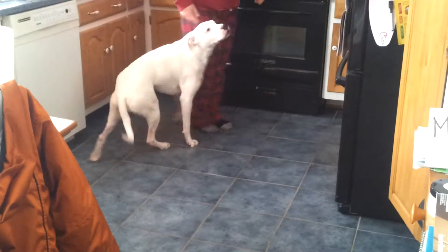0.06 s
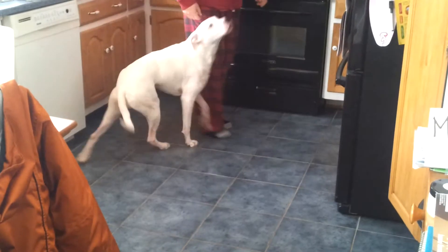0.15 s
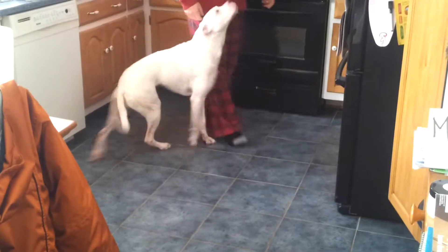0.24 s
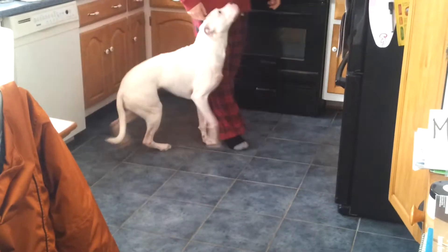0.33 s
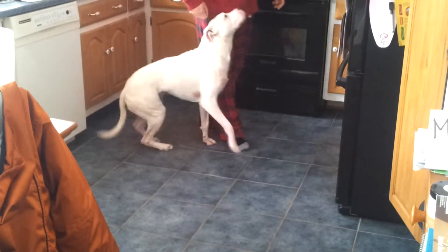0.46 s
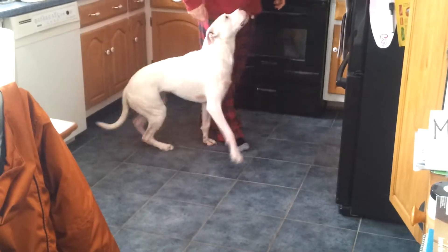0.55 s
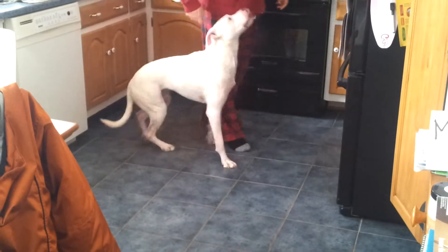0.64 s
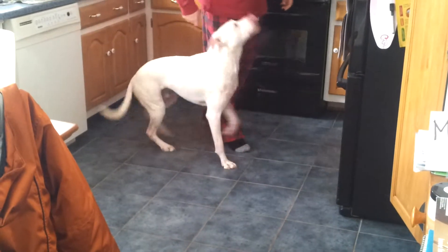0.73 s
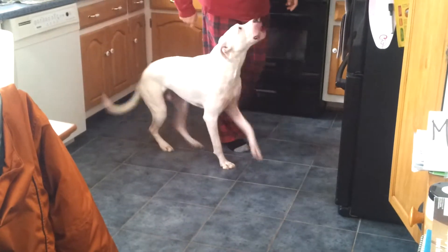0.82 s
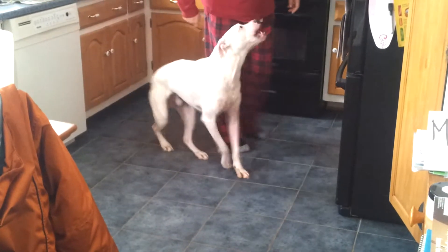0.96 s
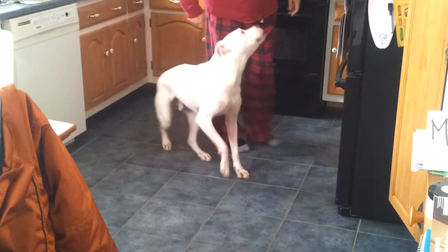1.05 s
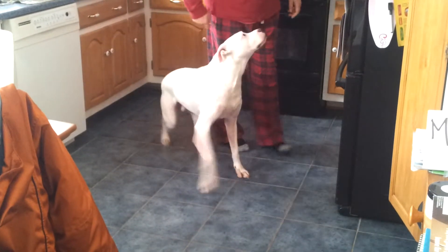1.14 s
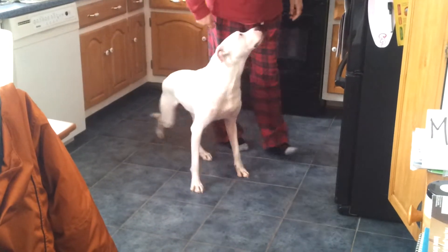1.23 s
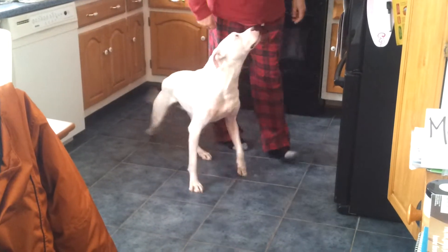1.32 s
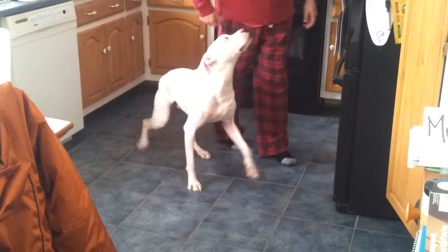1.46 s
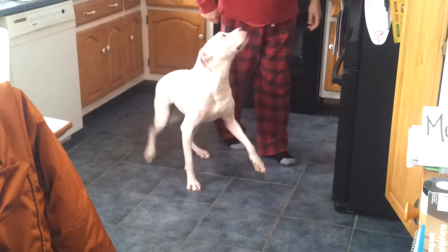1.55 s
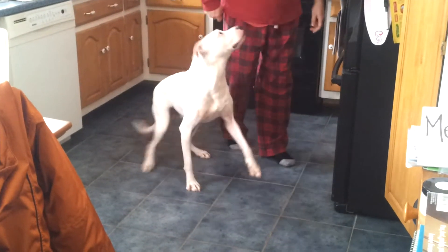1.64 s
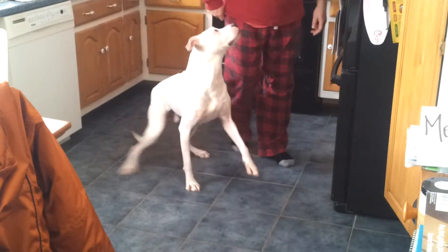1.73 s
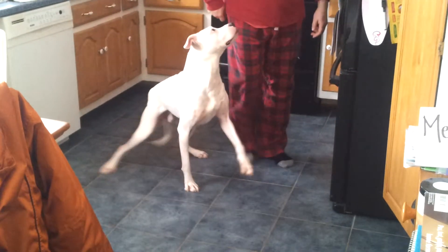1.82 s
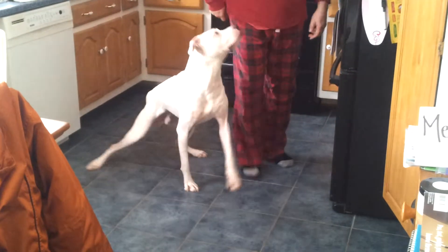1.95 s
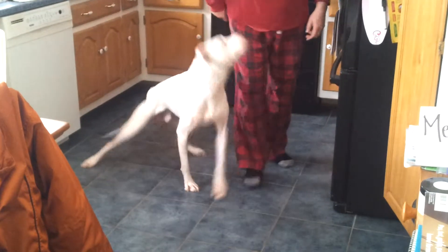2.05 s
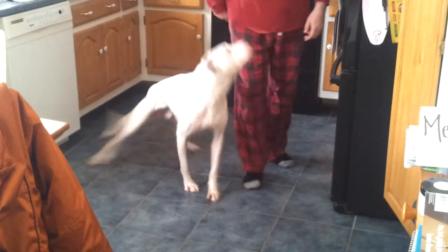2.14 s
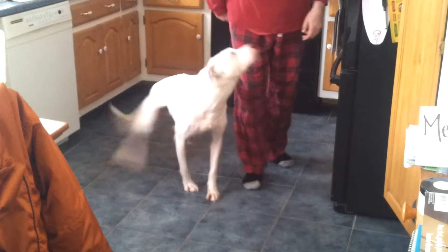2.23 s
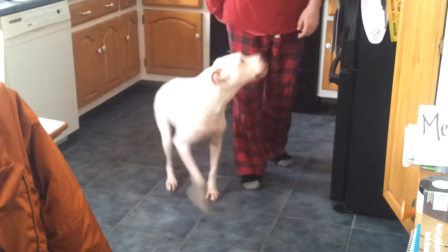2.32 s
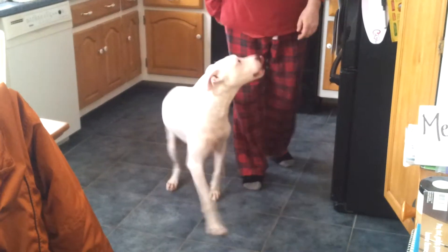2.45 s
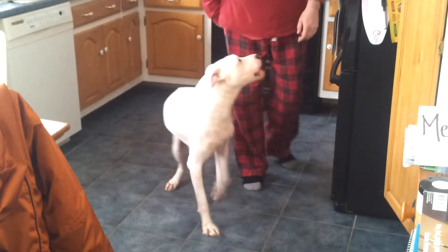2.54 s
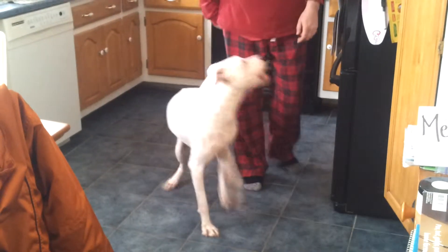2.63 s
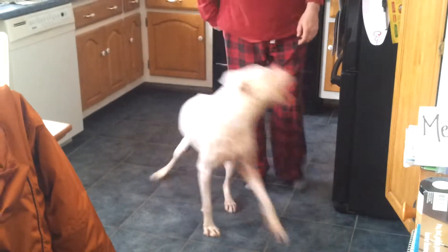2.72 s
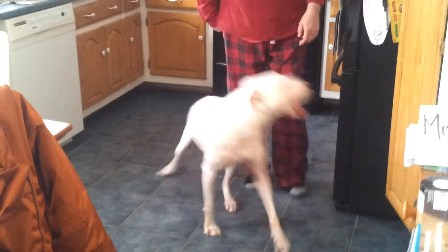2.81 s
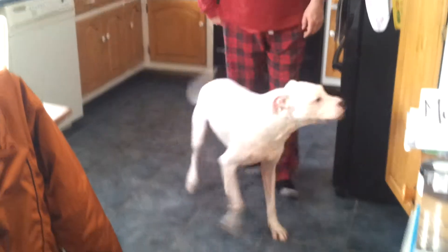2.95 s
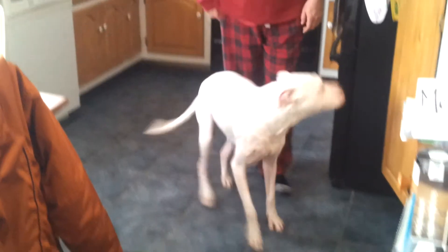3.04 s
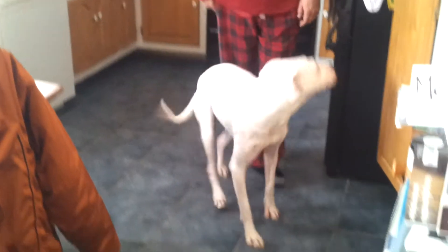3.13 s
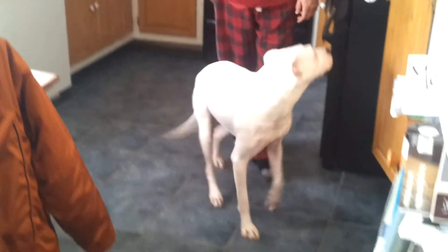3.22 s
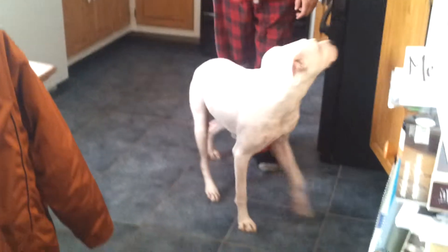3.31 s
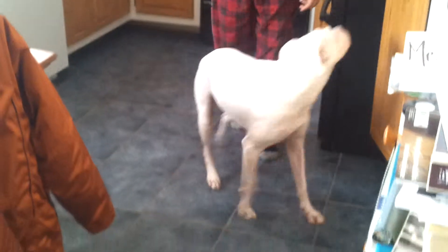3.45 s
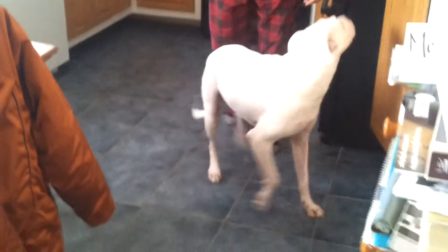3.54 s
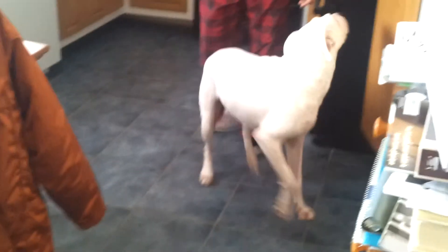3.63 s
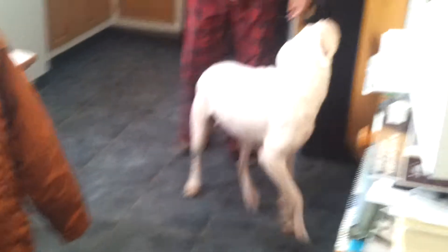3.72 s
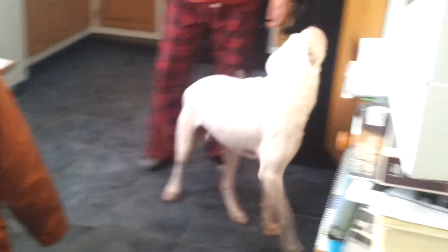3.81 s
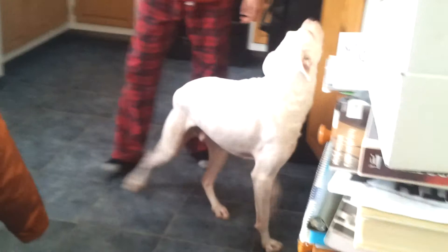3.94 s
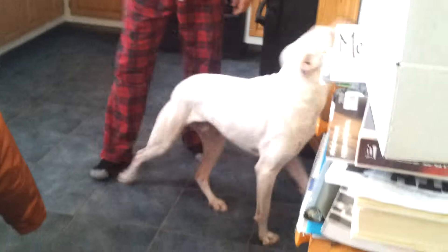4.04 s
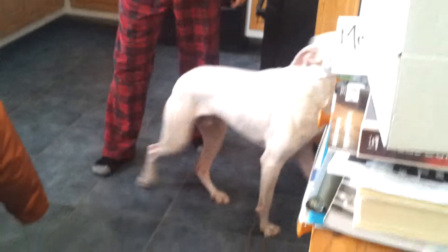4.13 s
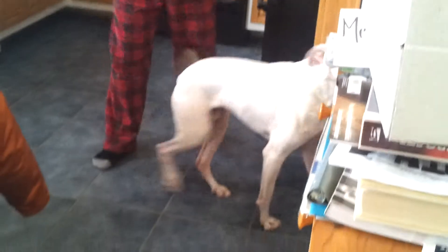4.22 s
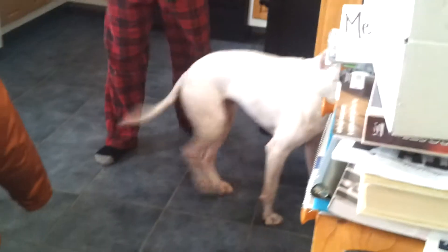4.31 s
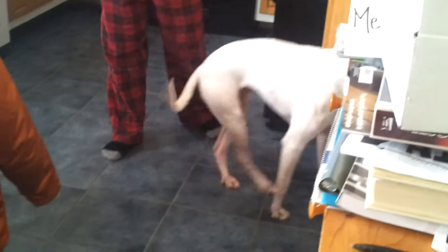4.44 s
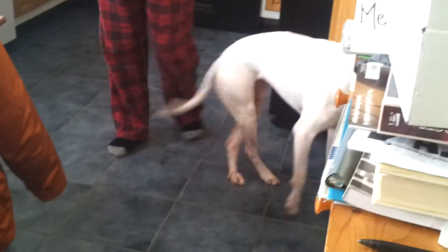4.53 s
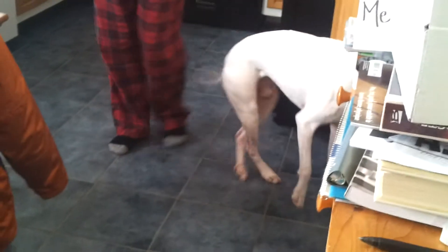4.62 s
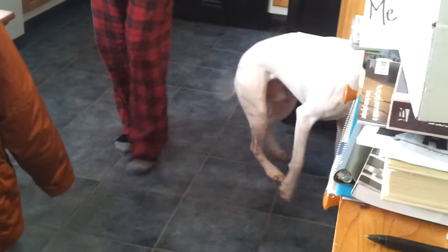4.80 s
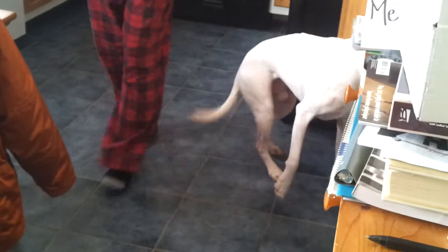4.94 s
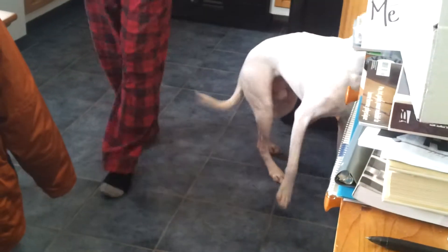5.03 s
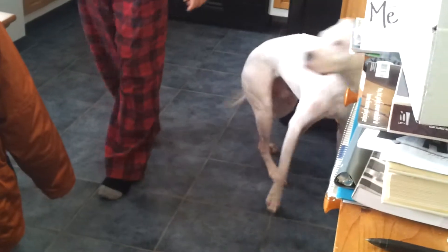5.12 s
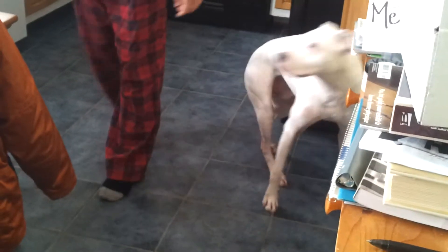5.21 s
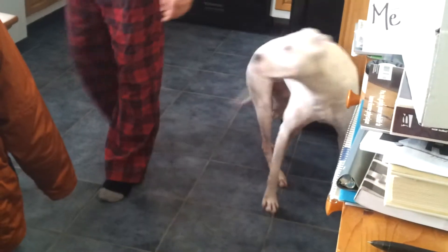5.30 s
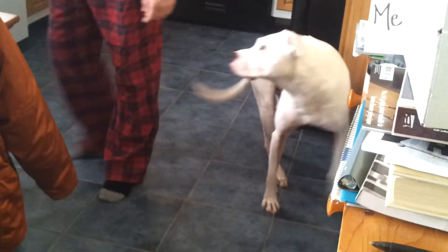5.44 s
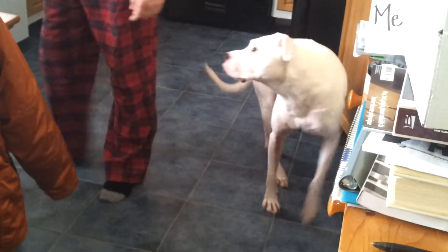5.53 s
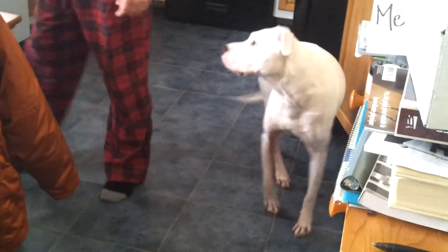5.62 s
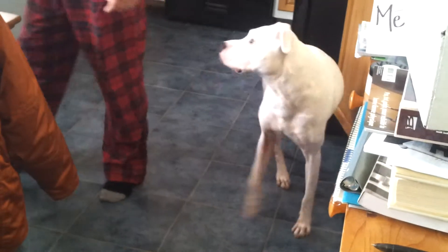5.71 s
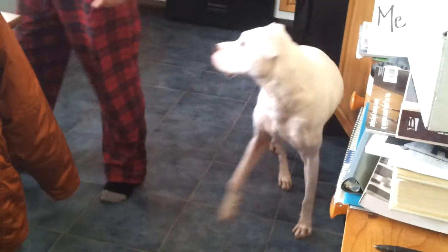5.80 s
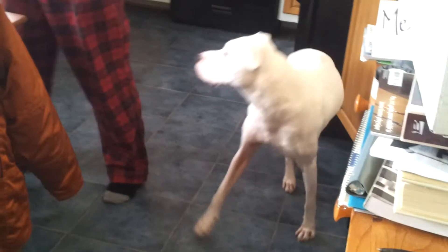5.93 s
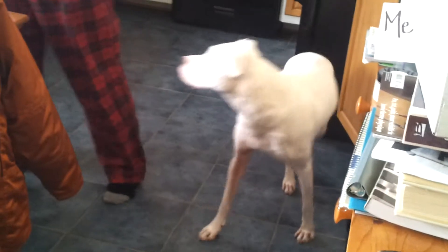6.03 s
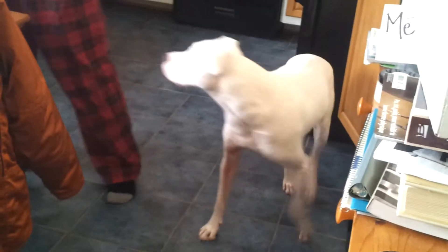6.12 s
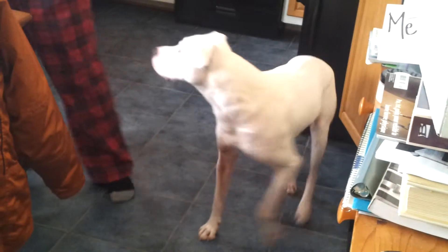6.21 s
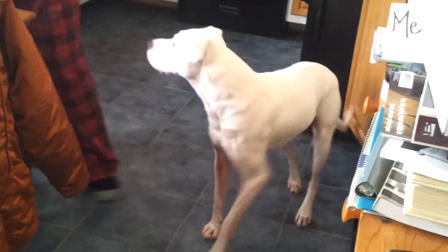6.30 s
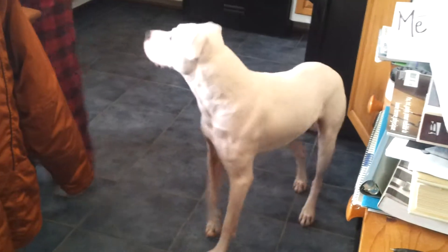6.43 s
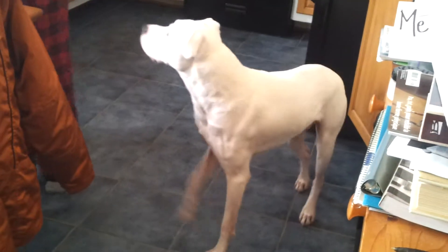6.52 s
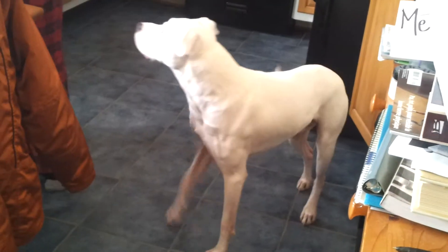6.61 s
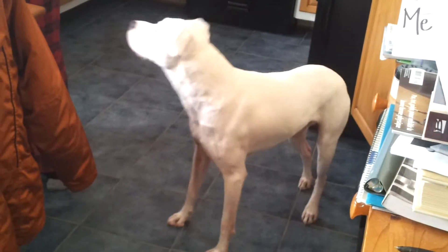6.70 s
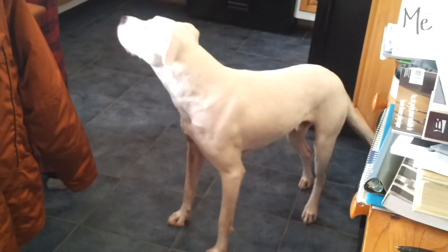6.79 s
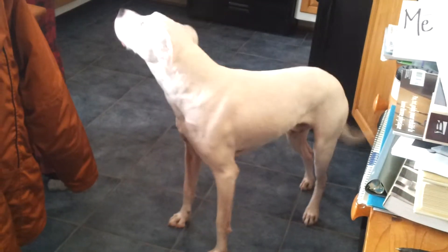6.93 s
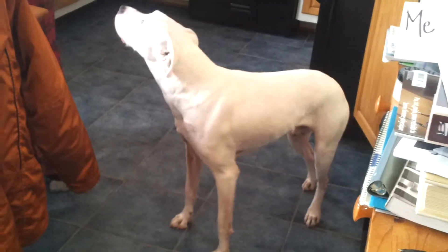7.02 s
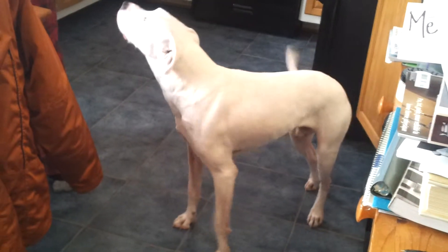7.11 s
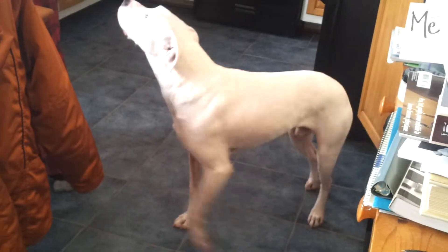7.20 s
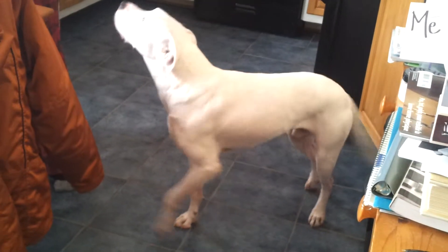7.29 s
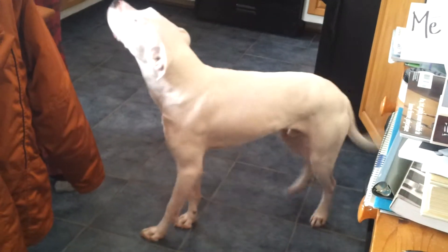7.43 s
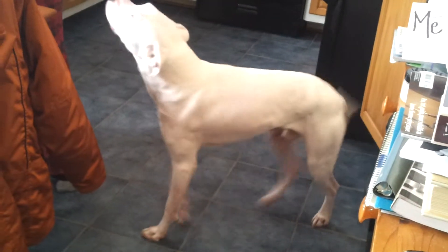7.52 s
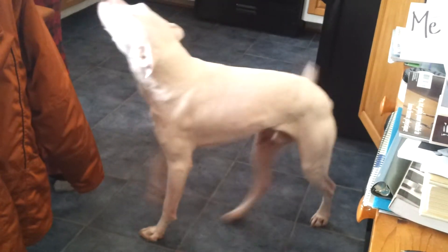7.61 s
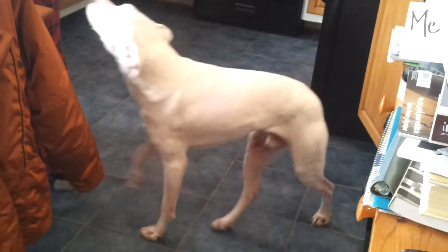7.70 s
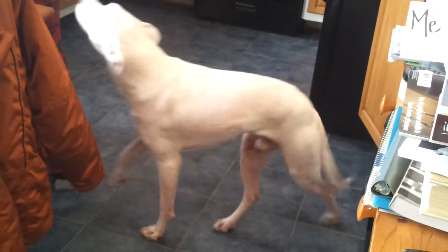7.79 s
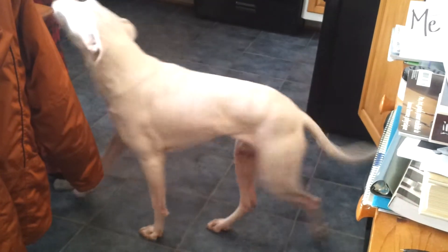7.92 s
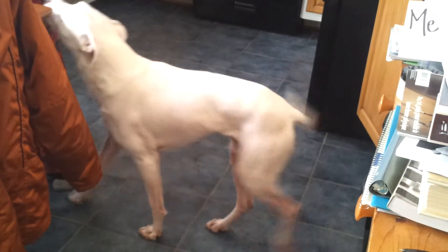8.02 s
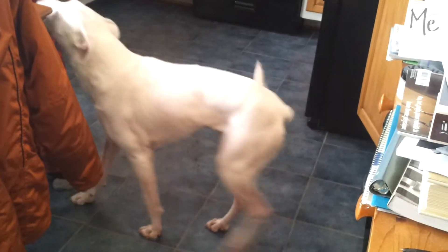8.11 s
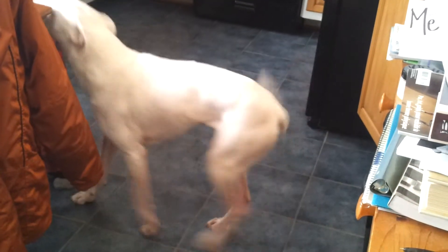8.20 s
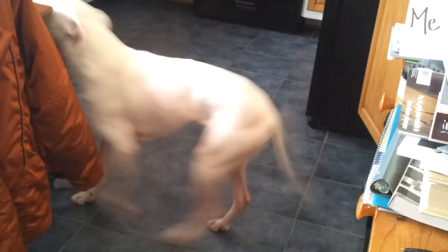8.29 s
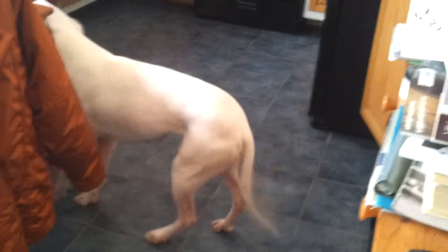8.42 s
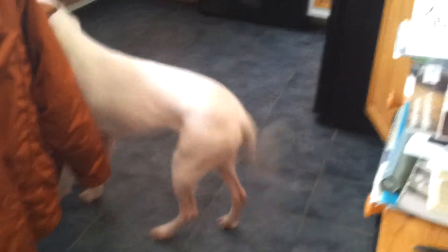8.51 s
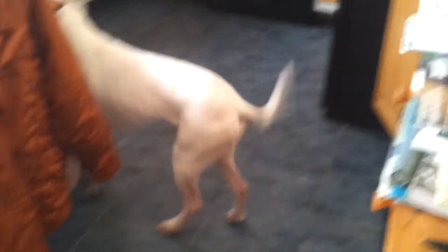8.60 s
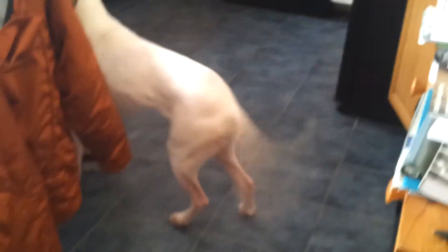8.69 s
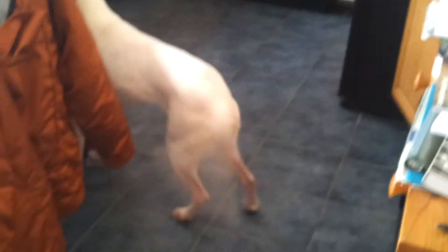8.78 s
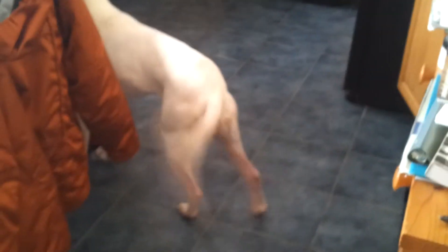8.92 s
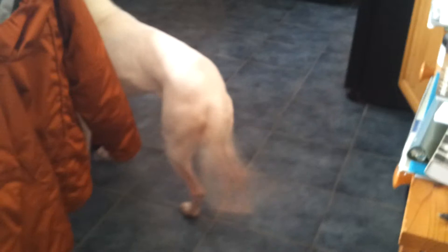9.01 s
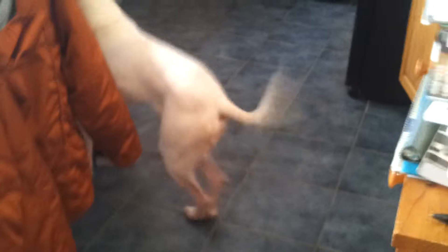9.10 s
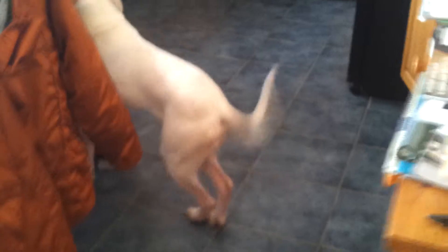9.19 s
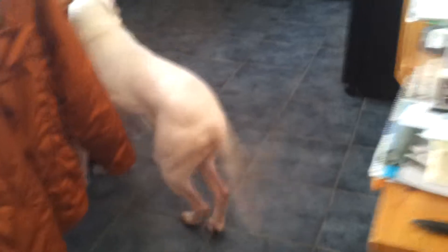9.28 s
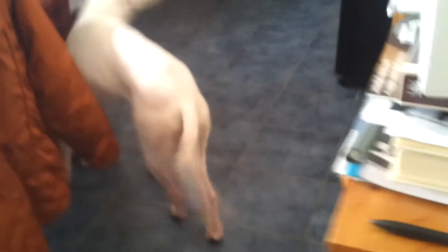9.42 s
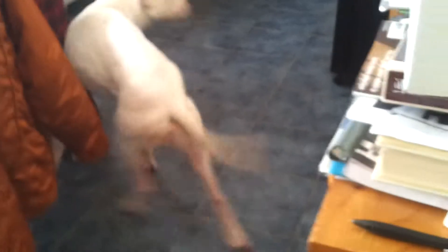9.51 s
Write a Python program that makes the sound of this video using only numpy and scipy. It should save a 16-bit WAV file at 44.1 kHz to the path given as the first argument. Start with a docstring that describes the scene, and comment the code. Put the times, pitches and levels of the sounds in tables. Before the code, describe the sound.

A large dog shuffles and turns on kitchen tile. Bright claw clicks and gritty skids come thickly in the first three seconds, with soft low paw thuds, tiny rough squeaks and a heavy bump against a cupboard. Steps then grow sparser, with a light wooden knock after seven seconds. A nearby microphone in a live, hard-walled room picks up short echoes, faint hiss and rustling.

```python
"""On the tiled floor of a hard-walled kitchen, a large dog shuffles and turns.
Its claws tap and skid: random contact forces excite a claw resonance. Its pads thud as damped
sines and chirp as short, rough, rising notes. Twice it bumps the furniture, exciting panel modes
and a wooden door; two hard ticks ring near 3 kHz. Echoes and a decaying tail follow each contact.
Under them lie faint hiss, soft rustle and a low rumble that swells after heavy treads."""
import sys
import numpy as np
from scipy import signal
from scipy.fft import rfft, irfft, next_fast_len
from scipy.io import wavfile

SR = 44100
rng = np.random.default_rng(int(sys.argv[2]) if len(sys.argv) > 2 else 0)


def wav_record(signal):
    """Record a signal, one row per channel, as 16-bit PCM in the file named by sys.argv[1]."""
    frames = np.transpose(np.atleast_2d(signal))
    bounded = np.clip(frames, -1, 1)
    # unit amplitude maps onto the largest positive 16-bit level
    quanta = np.round(bounded * 32767).astype(np.int16)
    wavfile.write(sys.argv[1], SR, quanta)


N = 421134
TIME = np.arange(N) / SR  # seconds
SIDES = np.array([[1], [-1]])  # left, right

# Event and band levels are relative; each source function adds its own gain.
# Room hiss: frequency_hz, density_db (per Hz)
HISS_SPECTRUM = [(15, -29), (25, -13), (60, -2), (131, -5), (181, -7), (529, -13.5), (769, -9.5), (856, -9),
                 (927, -13), (1350, -22.5), (1760, -17.5), (6720, -12.5), (9520, -15.5), (13800, -15),
                 (15000, -58)]
# Low floor rumble: frequency_hz, density_db (per Hz)
RUMBLE_SPECTRUM = [(12, -18), (28, 25), (45, -2), (70, -2), (100, -40), (170, -42)]
# Heavy treads that set the floor moving: start_s, level_db
HEAVY_TREADS = [(0.64, -60), (1.29, -39), (2.25, -55), (3.17, -43), (4.152, -43), (5.01, -36), (5.66, -49),
                (6.39, -46), (6.72, -51), (7.48, -49), (8.2, -51), (9.04, -53)]
# Soft rustle of moving bodies, level over time: time_s, level_db
RUSTLE_LEVEL = [(0, -45), (.8, -47.5), (1.35, -45), (1.7, -57), (2.25, -43), (3.1, -45.5), (3.6, -46),
                (4.2, -51), (4.42, -54.5), (4.62, -48), (5.45, -55.5), (6.0, -50.5), (6.7, -50), (7.1, -54),
                (8.0, -48.5), (8.3, -57), (8.95, -47.5), (9.55, -50)]
# Soft rustle: frequency_hz, density_db (per Hz)
RUSTLE_SPECTRUM = [(80, -25), (160, 4), (350, 2.5), (800, -1), (1400, -0.5), (3000, -4.5), (8000, -7),
                   (14000, -27)]
# Decay of the kitchen: frequency_hz, t60_s
ROOM_DECAY = [(150, 0.28), (600, 0.47), (2500, 0.53), (7000, 0.5), (13000, 0.33)]
# A claw on tile: frequency_hz, density_db (per Hz)
CLAW_SPECTRUM = [(350, -23.5), (700, -15), (1000, -14), (1400, -9), (2000, -5), (2560, -6), (3500, -5),
                 (4600, -6.5), (5600, -5.5), (6500, -1), (7300, -1.5), (8200, -7.5), (9500, -12.5),
                 (12100, -18.5), (15000, -31)]
# Claw slides: start_s, length_s, level_db, body_db (below 4.6 kHz)
CLAW_SKIDS = [(0.0, 0.05, -29.5, -6.5), (0.061, 0.087, -38.5, -1), (0.135, 0.089, -29.5, -4),
              (0.242, 0.039, -26, -8.5), (0.29, 0.083, -22, -7.5), (0.552, 0.058, -38, -6),
              (1.059, 0.084, -42, -9), (1.121, 0.061, -31.5, -7.5), (1.2, 0.049, -29, -7),
              (1.308, 0.23, -26, -5.5), (1.55, 0.078, -25, -10), (1.731, 0.081, -31.5, -11.5),
              (1.835, 0.084, -31.5, -8), (1.911, .16, -39, -6.5), (2.065, 0.14, -23.5, -7),
              (2.179, 0.078, -28, -6.5), (2.246, 0.063, -25, -14.5), (2.33, 0.12, -23.5, -9),
              (2.624, 0.095, -29.5, -13), (2.764, 0.065, -44, -1.5), (2.834, 0.077, -31, -10),
              (2.903, .06, -37.5, -11), (3.31, 0.25, -44.5, -10), (3.509, 0.03, -32, -6),
              (3.571, .065, -52, 8), (3.742, 0.08, -42, -9), (3.853, 0.21, -33.5, -7.5),
              (4.065, 0.12, -31, -10.5), (4.169, 0.044, -30.5, -3), (4.237, 0.023, -27.5, -12),
              (4.463, 0.059, -39, -18), (4.546, 0.039, -38.5, -9.5), (4.606, .09, -49, -12),
              (4.722, .07, -39.5, -9), (4.892, 0.11, -45.5, -14), (5.415, .03, -48, -8),
              (5.936, 0.086, -44, -3.5), (6.126, 0.038, -39, -9.5), (6.19, 0.054, -54, -17),
              (7.169, 0.057, -45, -5.5), (7.306, 0.069, -43, 0), (7.624, 0.097, -44, -21),
              (7.789, 0.08, -35, -10), (7.829, 0.077, -27.5, -6), (7.921, 0.18, -30.5, -4),
              (8.016, 0.1, -32, -3), (8.542, 0.13, -57, -26), (8.78, 0.092, -46, -7),
              (8.853, 0.057, -36, -8.5), (8.95, 0.099, -51, -12), (9.457, .04, -34, -9),
              (9.499, 0.087, -29, -9.5)]
# Pads twisting on the glaze: start_s, pitch_hz (mid-glide), level_db
PAD_CHIRPS = [(0.0, 713, -45.5), (0.872, 788, -40.5), (1.055, 605, -34.5), (1.128, 480, -48),
              (2.535, 1114, -45), (2.617, 977, -41), (2.655, 955, -43), (2.772, 690, -42.5),
              (2.80, 1192, -37.5), (2.972, 658, -41.5), (3.602, 1165, -40), (3.645, 1334, -44.5),
              (4.585, 1000, -46), (5.01, 722, -49)]
# Pads taking the weight: start_s, level_db, pitch_hz
PAD_THUDS = [(0.277, -38.5, 108), (0.636, -32.5, 198), (0.987, -36, 115), (1.011, -42.5, 257),
             (1.203, -29, 175), (1.314, -29, 160), (1.325, -30.5, 80), (1.388, -34, 315), (1.629, -38, 99),
             (1.865, -39, 111), (2.121, -37, 158), (2.27, -29.5, 81), (2.276, -35, 271), (2.469, -32, 189),
             (2.755, -38, 260), (2.829, -37, 162), (3.136, -32, 180), (3.444, -34, 192), (3.466, -34, 149),
             (3.869, -36.5, 177), (4.23, -43, 290), (4.631, -44, 300), (4.694, -39.5, 151),
             (4.745, -41.5, 80), (5.625, -34, 194), (6.015, -38, 222), (6.383, -43, 298), (6.683, -37, 174),
             (6.805, -38, 128), (7.336, -38, 120), (7.882, -39, 180), (8.45, -31, 170), (9.043, -39.5, 158)]
# Claws landing: start_s, level_db, body_db (below 4.6 kHz), edge_db (above 9 kHz), drag_ms (decay constant)
CLAW_TAPS = [(0.630, -17, -12.5, -10, 0.86), (0.984, -26.5, -12, -6.5, 1.3),
             (1.006, -22.5, -13.5, -15, 2.6), (1.190, -13, -14, -10, 5.9), (1.277, -12.5, -15, -10.5, 5.5),
             (1.309, -15, -6.5, -18, 3.2), (1.319, -9.5, -16, -19, 3), (1.446, -15.5, -11.5, -17, 3.5),
             (2.92, -22.5, -14, -9, 4.6), (3.1446, -15.5, -18.5, -8.5, 0.26), (3.861, -22, -11, -5.5, 1.1),
             (3.988, -20.5, -15, -9.5, 4.7), (4.765, -30, -17, -12, 2.1), (5.187, -25, -9.5, -9.5, 0.16),
             (5.6134, -14.5, -14, -14.5, 0.48), (6.050, -32, -18, -9, 0.73), (6.3644, -19, -17.5, -12, 1.3),
             (6.384, -16.5, -17.5, -10.5, 0.079), (6.5136, -26, -11, -12, 0.87),
             (6.6666, -17.5, -13.5, -10, 2.3), (6.678, -22, -12, -6, 0.25),
             (7.4353, -17, -15.5, -10.5, 1.5), (7.568, -26, -10.5, -13, 9.7), (7.8365, -23, -16, -15, 0.7),
             (8.211, -28.5, -15, -10, 3.4), (8.443, -19.5, -13, -9.5, 3), (9.0415, -31, -4.5, -5, 0.29),
             (9.0581, -15.5, -14.5, -14.5, 0.29), (9.0645, -21, -26, -24, 0.44),
             (9.3701, -25, -12, -9, 0.42), (9.375, -20.5, -10, -9.5, 15), (9.538, -21.5, -16.5, -13, 2.2)]
# Place of the landing claws: time_s, direct_db (straight sound over the tail), left_right_db
CLAW_PATH = [(0, -27.5, -1.5), (2.5, 12, 2.5), (3.2, -8.5, -1), (5.0, -12.5, -0.5), (6.0, -4.5, -1.5),
             (7.5, -9, -0.5), (8.5, -9.5, -1), (9.1, -3.5, 0.5)]
# Bumps against cupboards: start_s, level_db, heavy_db, light_db
FURNITURE_BUMPS = [(1.309, -22.5, 2.5, -7), (1.316, -24.5, 1, -22), (1.327, -39, -10, -33),
                   (7.327, -19.5, -23, 1)]
# Modes of a heavy cupboard panel: frequency_hz, level_db, t60_s
PANEL_MODES = [(79, -0.5, 0.22), (118, -26, 0.052), (323.6, 1.5, 0.16), (363, 0.5, 0.075), (429, 3, 0.059),
               (760, 2, 0.027), (1070, -27, .03), (1375, 3, 0.045), (1900, -19, 0.023), (2510, 3, .02)]
# A light wooden door: frequency_hz, density_db (per Hz)
DOOR_SPECTRUM = [(60, -40), (110, -16), (220, -8.5), (300, -0.5), (400, -7.5), (520, -7.5), (700, -1),
                 (1000, -5), (1600, -7), (1900, -14), (2250, -18), (2700, -27), (6000, -68), (12000, -80)]
# Hard ticks: start_s, level_db
HARD_TICKS = [(3.1447, -32), (3.266, -37)]
# Ring of a tick: frequency_hz, t60_s
TICK_RING = [(2700, 0.0093), (3020, 0.017), (3350, 0.0058)]


def from_db(db):
    """Amplitude ratio: 20 dB is a factor of ten."""
    return 10 ** (np.asarray(db) / 20)


def rms_one(x):
    """Power normalisation: the root mean square becomes 1."""
    return x / np.sqrt(np.mean(x ** 2) + 1e-20)


def at_hz(points, hz):
    """Logarithmic pitch scale: a table is interpolated over log frequency."""
    points = np.array(points)
    return np.interp(np.log(np.maximum(hz, 1)), np.log(points[:, 0]), points[:, 1])


def response(spectrum, size=8192):
    """Minimum phase: folding the cepstrum gives a causal impulse response, here of unit energy."""
    magnitude = from_db(at_hz(spectrum, np.fft.rfftfreq(size, 1 / SR)))
    cepstrum = irfft(np.log(magnitude))
    cepstrum[1:size // 2] *= 2
    cepstrum[size // 2 + 1:] = 0
    h = irfft(np.exp(rfft(cepstrum)))[:size // 2]
    return h / np.linalg.norm(h)


def through(x, h):
    """Linear system: the output is the input convolved with the impulse response, mono or stereo."""
    return signal.fftconvolve(np.atleast_2d(x), np.atleast_2d(h), axes=-1)


def add(out, start_s, sound):
    """Superposition: a sound is summed in from its start, or from zero if that is negative."""
    start = max(round(start_s * SR), 0)
    out[:, start:start + sound.shape[1]] += sound[:, :max(N - start, 0)]


def stereo_noise(size, alike_hz=800):
    """Diffuse-field coherence: two nearby points share the bass but not the treble."""
    mid, side = rfft(rng.standard_normal((2, size)))
    coherence = .88 / (1 + (np.fft.rfftfreq(size, 1 / SR) / alike_hz) ** 4)
    return irfft(np.sqrt(1 + coherence) * mid + np.sqrt(1 - coherence) * side * SIDES, size)


def air(spectrum):
    """Filtered noise: a steady diffuse sound of one colour with rms 1."""
    h = response(spectrum)
    noise = stereo_noise(next_fast_len(N + len(h)))
    return rms_one(through(noise, h)[:, len(h):len(h) + N])


def drift(rate, size):
    """Band-limited fluctuation: a random wander of spread about 1 with rate new values a second."""
    steps = np.arange(size) * rate / SR
    return np.interp(steps, np.arange(1024), rng.standard_normal(1024))


def kitchen(direct_db, build_s=0.0018, echo_db=-3, fade_s=0.0024, size=22050):
    """Room response for a spot on the floor: straight path, floor and cupboard echoes, diffuse decay."""
    t, hz = np.arange(size) / SR, np.fft.rfftfreq(size, 1 / SR)
    noise, room = rfft(stereo_noise(size)), 0
    for centre, t60 in ROOM_DECAY:
        share = at_hz([(f, f == centre) for f, _ in ROOM_DECAY], hz)
        room = room + irfft(noise * share) * from_db(-60 * t / t60)
    room *= 1 - np.exp(-t / build_s)
    room /= np.sqrt(np.sum(room ** 2) / 2)
    room[[0, 1], rng.integers(0, 3, size=2)] += from_db(direct_db)
    for delay_s in np.exp(rng.uniform(np.log(.0008), np.log(.022), size=7)):
        at = (delay_s * SR + rng.uniform(0, 10, size=2)).astype(int)
        echo = from_db(direct_db + echo_db) / (1 + delay_s / fade_s)  # longer paths are weaker
        room[[0, 1], at] += rng.choice([-1, 1]) * echo
    return room / np.sqrt(np.sum(room ** 2) / 2)


def floor_rumble(noise_db=-4, swing_db=-2, rest_db=-60.5, swell_s=0.046, floor_hz=30):
    """Forced vibration: each heavy tread swells the rumble and swings the floor at a low pitch."""
    sway, swing = 0, 0
    for start_s, level_db in HEAVY_TREADS:
        t = np.maximum(TIME - start_s, 0)
        swell = from_db(level_db) * t / swell_s * np.exp(1 - t / swell_s)  # peaks after swell_s
        sway = sway + swell
        swing = swing + swell * np.sin(2 * np.pi * floor_hz * t)
    noise_level = from_db(rest_db) + from_db(noise_db) * sway
    return noise_level * air(RUMBLE_SPECTRUM) + from_db(swing_db) * swing


def background(hiss_db=-54, rustle_gain_db=-3.5):
    """Broadband noise: steady room hiss, floor rumble and the varying rustle of fur and cloth."""
    hiss = from_db(hiss_db) * air(HISS_SPECTRUM)
    rumble = floor_rumble()
    rustle_db = np.interp(TIME, *np.transpose(RUSTLE_LEVEL)) + rustle_gain_db
    rustle = from_db(rustle_db) * air(RUSTLE_SPECTRUM)
    return hiss + rumble + rustle


def claw_parts(x, body_hz=4600, edge_hz=9000):
    """Band division: a claw sound splits into hollow body, 7 kHz ring and sharp edge."""
    body = signal.sosfiltfilt(signal.butter(4, body_hz, fs=SR, output="sos"), x)
    edge = signal.sosfiltfilt(signal.butter(4, edge_hz, "high", fs=SR, output="sos"), x)
    return body, x - body - edge, edge


def skid_pressure(t, length_s, attack_share=0.33, release_s=0.017, judder_db=2, judders_per_s=90):
    """Sliding load: the claw presses in for a share of the slide, judders along and lifts."""
    press = np.sin(np.pi / 2 * np.minimum(t / (attack_share * length_s), 1)) ** 2
    lift = np.exp(-np.maximum(t - length_s, 0) / release_s)
    return press * lift * from_db(judder_db * drift(judders_per_s, len(t)))


def skids(gain_db=-1, body_gain_db=5, edge_db=0.5, catches_per_s=3000, grit_db=3.5, direct_db=-5, size=3500):
    """Friction excitation: a sliding claw catches on the tile's grain thousands of times a second."""
    out, claw, t = np.zeros((2, N)), response(CLAW_SPECTRUM, size=1024), TIME[:size * 4]
    for start_s, length_s, level_db, body_db in CLAW_SKIDS:
        pressure = from_db(level_db + gain_db) * skid_pressure(t, length_s)
        strengths = from_db(grit_db * np.minimum(rng.exponential(1, len(t)), 5))
        signed = strengths * rng.choice([-1, 1], len(t))
        catches = rms_one(signed * (rng.random(len(t)) < catches_per_s / SR))
        body, ring, edge = claw_parts(through(catches, claw)[:, :len(t)])
        scrape = from_db(body_db + body_gain_db) * body + ring + from_db(edge_db) * edge
        scrape = scrape * pressure
        for i in range(0, len(t), size):  # the paw travels, so every stretch meets other echoes
            add(out, start_s + t[i], through(scrape[:, i:i + size], kitchen(direct_db)))
    return out


def chirps(gain_db=-3, length_s=0.025, glide=0.096, rough=0.93, direct_db=-6):
    """Stick-slip: a twisting pad gives a short rising note whose phase wanders at random."""
    out, t = np.zeros((2, N)), np.arange(0, length_s, 1 / SR)
    for start_s, pitch_hz, level_db in PAD_CHIRPS:
        wander = rough * np.cumsum(rng.standard_normal(len(t))) * np.sqrt(pitch_hz / SR)
        rising_hz = pitch_hz * (1 + glide * (t / length_s - .5))
        phase = 2 * np.pi * np.cumsum(rising_hz) / SR + wander
        note = rms_one(np.sin(phase) * np.sin(np.pi * t / length_s))
        chirp = from_db(level_db + gain_db) * through(note, kitchen(direct_db))
        add(out, start_s - .008, chirp)  # the note swells in
    return out


def pads(gain_db=26, cycles=2.25, direct_db=-10, lead_s=0.00389):
    """Damped oscillation: a soft pad thuds, losing 60 dB in a few cycles, and blooms in the room."""
    out, t = np.zeros((2, N)), TIME[:SR // 10]
    for start_s, level_db, pitch_hz in PAD_THUDS:
        decay = from_db(-60 * t * pitch_hz / cycles)
        thud = np.sin(2 * np.pi * pitch_hz * t) * t * decay
        bloom = through(thud / np.linalg.norm(thud), kitchen(direct_db, build_s=0.011))
        add(out, start_s - lead_s, from_db(level_db + gain_db) * bloom)
    return out


def landing_force(t, drag_s, spread_s=0.0044, follow_db=-12, bite=0.22):
    """Impact with friction: one claw lands, three weaker ones follow, each scratching until it grips."""
    contact = np.exp(-t / drag_s) * (1 - np.exp(-t / (bite * drag_s)))  # a dragged claw bites in gradually
    pressure = contact.copy()
    for late_s in rng.uniform(0.11, 1, size=3) * spread_s:
        pressure += from_db(follow_db) * np.interp(t - late_s, t, contact, left=0)
    friction = rfft(pressure * rng.standard_normal(len(t)))
    # equal strength at all pitches, so the claw sets the colour
    return irfft(friction / np.abs(friction))[:len(t) * 3 // 4]


def taps(gain_db=23.5, body_gain_db=7, edge_gain_db=12):
    """Impact excitation: the forces of landing claws sound through the claw's resonance and the room."""
    out, claw, t = np.zeros((2, N)), response(CLAW_SPECTRUM, size=1024), TIME[:2048]
    path_s, path_direct_db, path_pan_db = np.transpose(CLAW_PATH)
    for start_s, level_db, body_db, edge_db, drag_ms in CLAW_TAPS:
        scratch = through(landing_force(t, drag_ms / 1000), claw)
        body, ring, edge = claw_parts(scratch / np.linalg.norm(scratch))
        click = from_db(body_db + body_gain_db) * body + ring + from_db(edge_db + edge_gain_db) * edge
        room = kitchen(np.interp(start_s, path_s, path_direct_db))
        pan_db = np.interp(start_s, path_s, path_pan_db)
        add(out, start_s, through(click, room) * from_db(level_db + gain_db + .5 * pan_db * SIDES))
    return out


def heavy_panel():
    """Modal vibration: a struck panel sounds as a sum of decaying sines, here of unit energy."""
    t = TIME[:8192]
    panel = sum(from_db(level_db - 60 * t / t60) * np.sin(2 * np.pi * hz * t)
                for hz, level_db, t60 in PANEL_MODES)
    return panel / np.linalg.norm(panel)


def light_door(shudder_db=-11, shudder_t60=.35):
    """Impulse response: a door gives a dull wooden clack and shudders on its hinges as decaying noise."""
    clack = response(DOOR_SPECTRUM, size=16384)
    t = TIME[:len(clack)]
    shaking = rng.standard_normal(len(t)) * from_db(-60 * t / shudder_t60)
    shudder = through(shaking, clack)[0, :len(t)]
    return clack + from_db(shudder_db) * shudder / np.linalg.norm(shudder)


def bumps(panel_gain_db=28, door_gain_db=27, direct_db=-9):
    """Shared impact: each blow excites the heavy panel and the light door in its own proportion."""
    out, panel, door = np.zeros((2, N)), heavy_panel(), light_door()
    for start_s, level_db, heavy_db, light_db in FURNITURE_BUMPS:
        blow = from_db(panel_gain_db + heavy_db) * panel + from_db(door_gain_db + light_db) * door
        add(out, start_s, from_db(level_db) * through(blow, kitchen(direct_db)))
    return out


def ticks(gain_db=24, direct_db=-2):
    """Free vibration: a hard contact rings briefly in three modes near 3 kHz."""
    out, t = np.zeros((2, N)), TIME[:2048]
    ring = sum(np.sin(2 * np.pi * hz * t) * from_db(-60 * t / t60) for hz, t60 in TICK_RING)
    ring /= np.linalg.norm(ring)
    for start_s, level_db in HARD_TICKS:
        add(out, start_s, from_db(level_db + gain_db) * through(ring, kitchen(direct_db)))
    return out


def scene(claw_pan_db=-0.14, low_pan_db=1.13):
    """Level panning: claws lean slightly right, the other sounds left, the ticks stay unpanned."""
    others = background() + chirps() + pads() + bumps()
    claws = skids() + taps()
    return claws * from_db(claw_pan_db * SIDES) + others * from_db(low_pan_db * SIDES) + ticks()


def record(dry, cutoff_hz=14800):
    """Elliptic low-pass filtering: the treble above the cutoff is cut steeply."""
    return signal.sosfilt(signal.ellip(10, .2, 80, cutoff_hz, fs=SR, output="sos"), dry)


dry = scene()
out = record(dry)
wav_record(out)
```